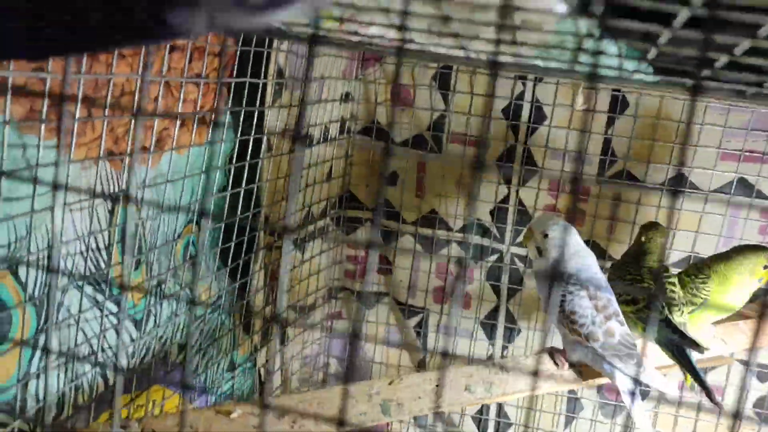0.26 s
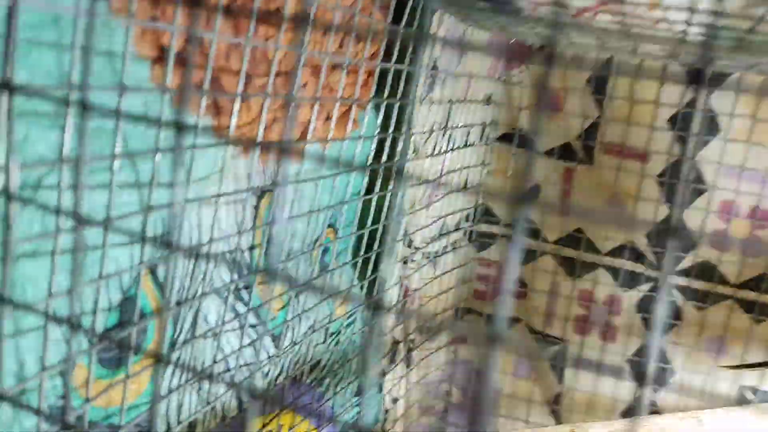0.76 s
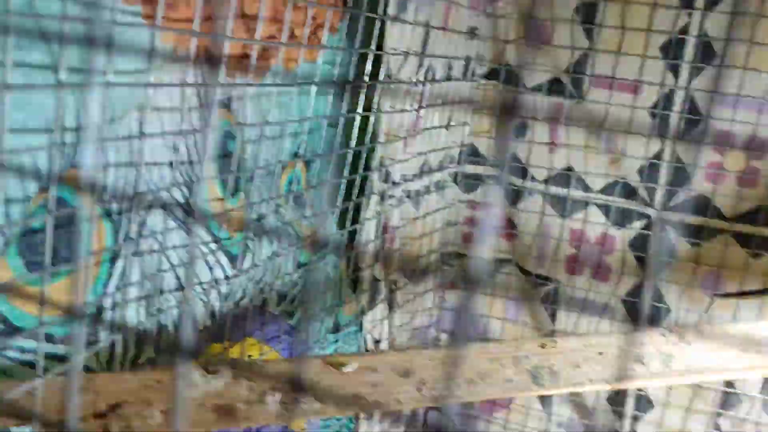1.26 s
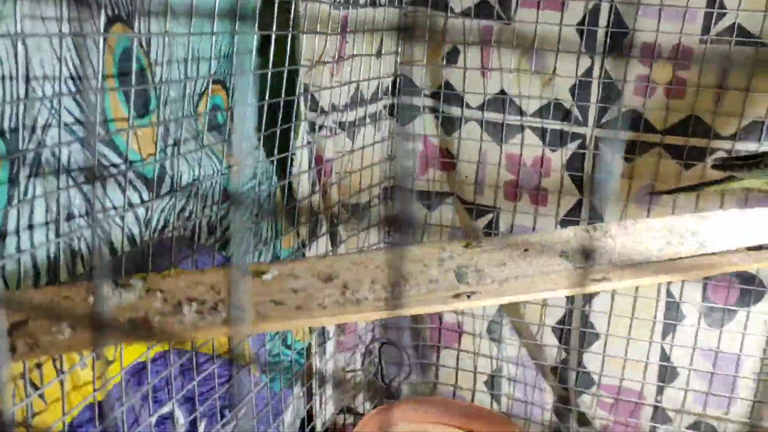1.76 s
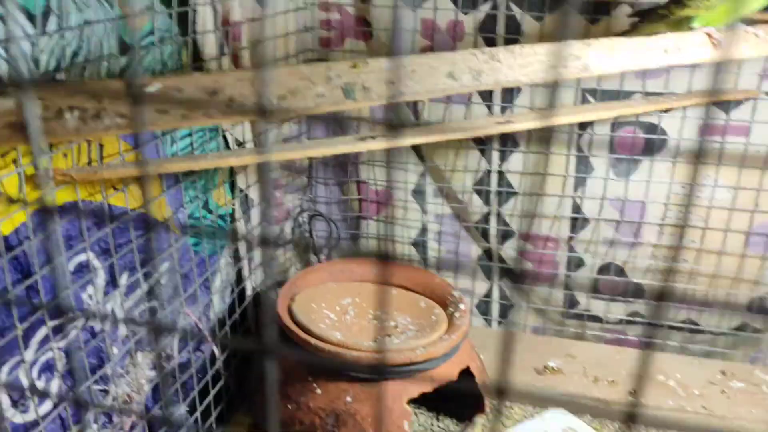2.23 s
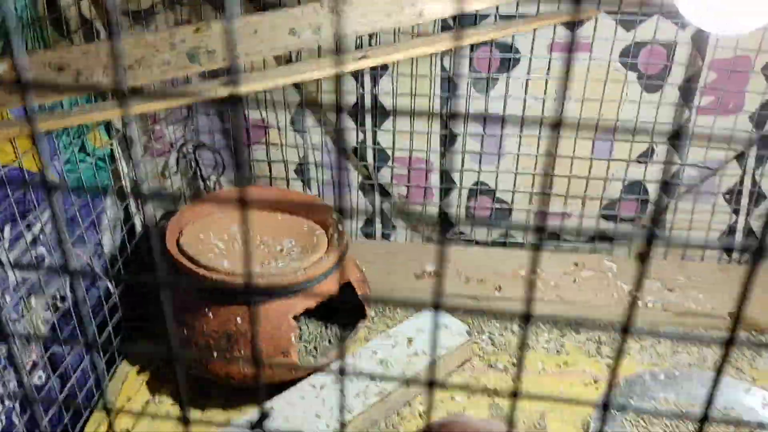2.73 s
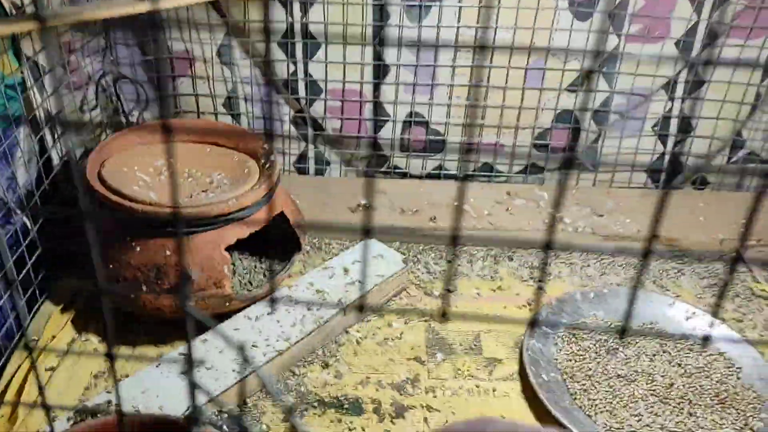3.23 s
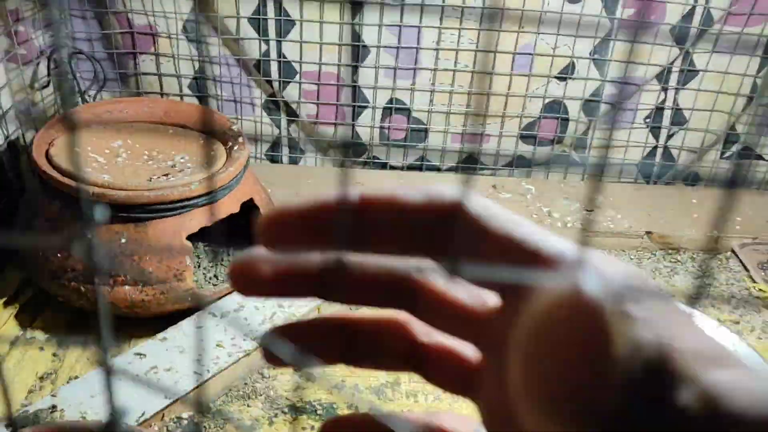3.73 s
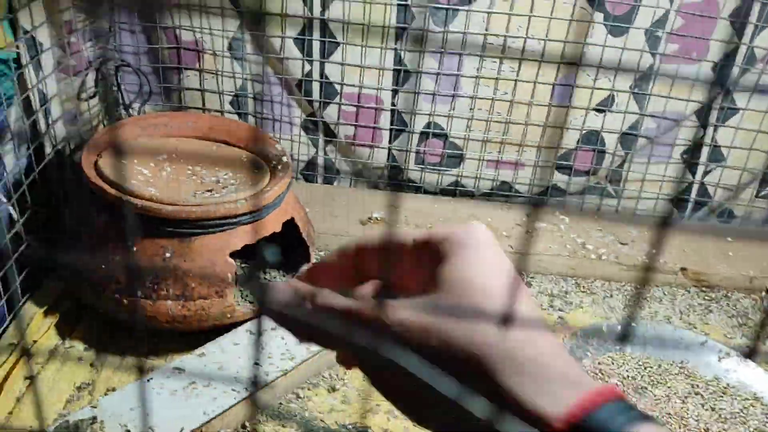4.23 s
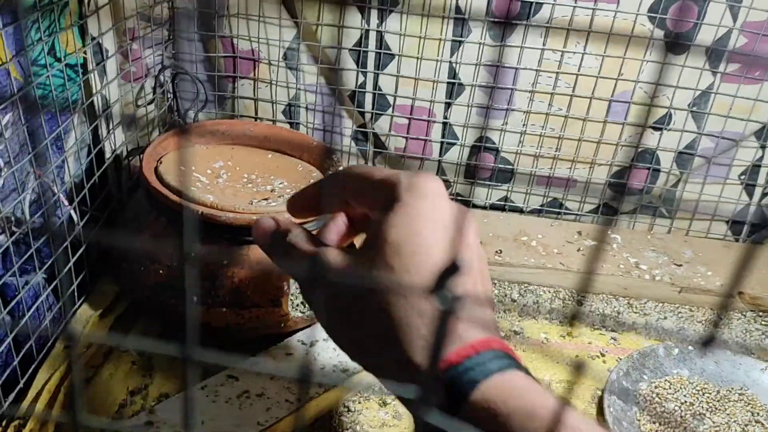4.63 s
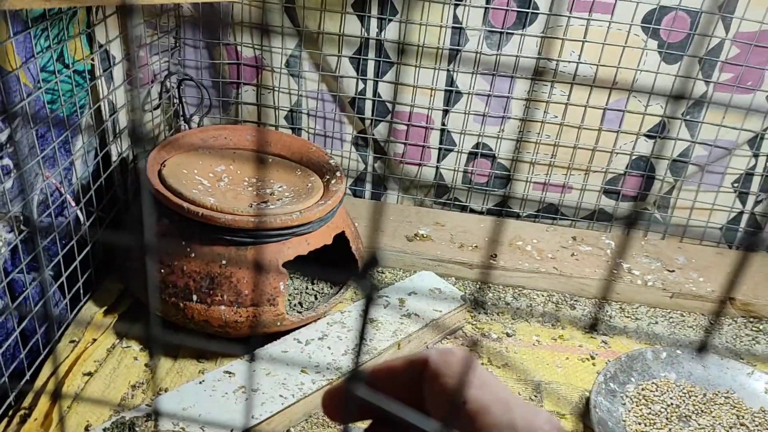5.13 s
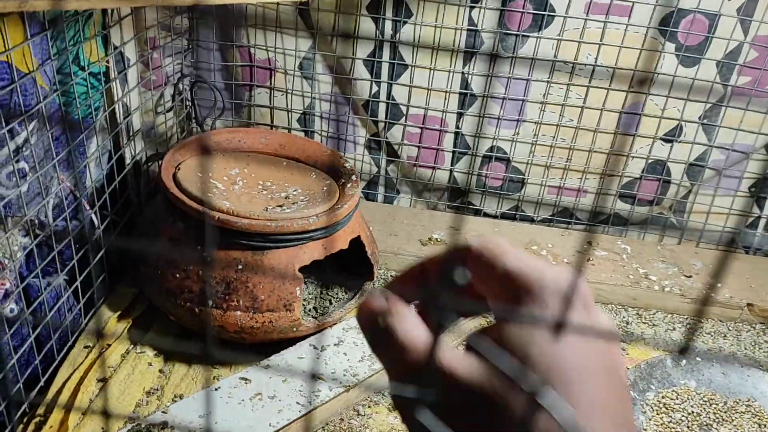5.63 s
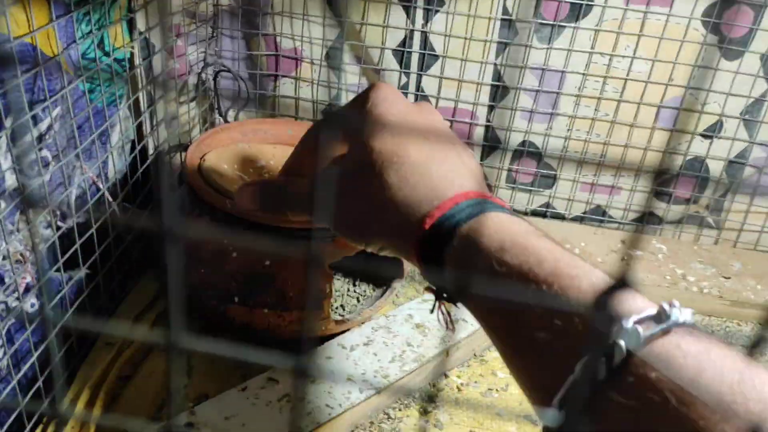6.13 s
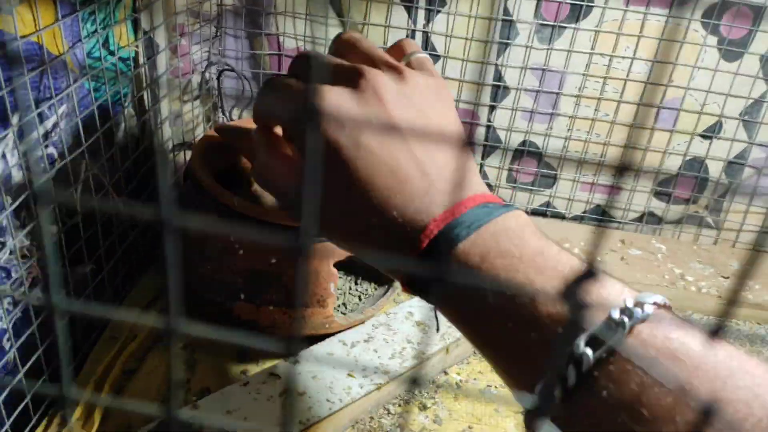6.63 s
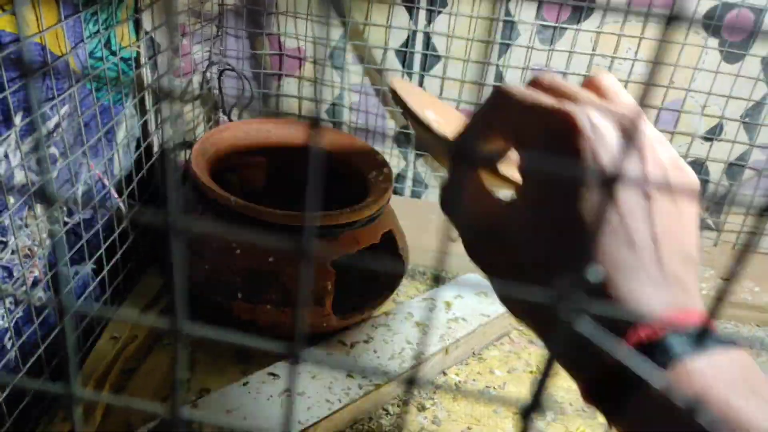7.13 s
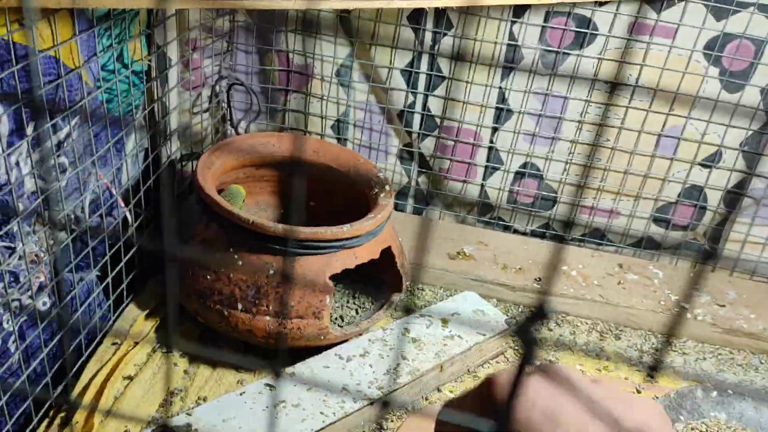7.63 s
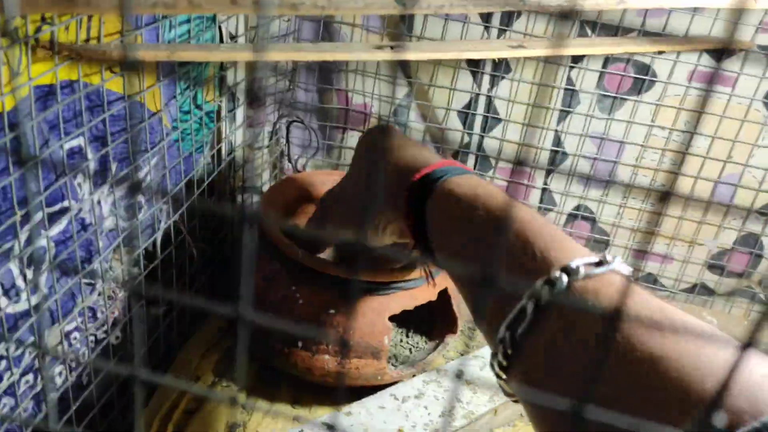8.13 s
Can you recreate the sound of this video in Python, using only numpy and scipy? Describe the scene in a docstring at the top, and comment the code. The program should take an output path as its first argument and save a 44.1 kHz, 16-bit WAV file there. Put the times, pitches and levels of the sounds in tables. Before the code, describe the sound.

A budgie chick begs with rapid, high, raspy chirps from a clay pot, after a brief flutter of wings in a wire cage.

```python
"""In a small room, inside a clay nest pot in a wire cage, a budgerigar chick begs about seven times a second.
Each chirp is a train of tiny rising whistles from its syrinx, smeared into a rasp by the pot's walls.
Early on the adults flap off their perch, pushing air, ticking the wire and stirring seed husks.
Later a hand lifts the clay lid with a knock, and the chirps turn louder and brighter."""
import sys
import numpy as np
from scipy import signal
from scipy.fft import rfft, irfft, next_fast_len
from scipy.io import wavfile
from scipy.ndimage import uniform_filter1d, minimum_filter1d, map_coordinates

SR = 44100
rng = np.random.default_rng(int(sys.argv[2]) if len(sys.argv) > 2 else 0)


def to_wav(s):
    """Save 16-bit WAV."""
    ch = np.atleast_2d(s).T  # columns
    pcm = np.round(np.clip(ch, -1, 1) * 32767)  # PCM
    wavfile.write(sys.argv[1], SR, pcm.astype(np.int16))


N = 369999
TIME = np.arange(N) / SR

# EQ curves for the noise layers (frequency [Hz], level [dB])
ROOM_EQ = [(15, -61), (25, 14.5), (50, 1), (75, 3), (95, -11.5), (213, -4.5), (293, -11.5), (462, -12.5),
           (879, -19), (1120, -22), (7280, -44.5), (15000, -77)]
DRAUGHT_EQ = [(15, -44), (25, 14), (213, 11.5), (405, -2.5), (475, -0.5), (724, -2.5), (2220, -18.5),
              (3000, -15), (3900, -97), (6600, -120)]
RUSTLE_EQ = [(600, -14), (1500, -9), (3000, -3), (5000, -9.5), (7500, 8), (8800, 6), (10500, -15.5),
             (15500, -18.5)]
SCUFF_EQ = [(100, -40), (330, 3.5), (550, 1.5), (800, -1.5), (1400, -7), (2500, -15), (6000, -46)]
THUD_EQ = [(60, -38), (200, 10), (600, 2.5), (1200, 1), (2200, -6.5), (8000, -16)]
FRAME_EQ = [(160, 14.5), (1300, 6), (2400, 9.5), (5000, -53)]
PUFF_EQ = [(10, -40), (28, -3), (60, 3), (170, 0), (400, -20)]
CLACK_EQ = [(100, -17), (250, 2), (1500, -11), (4000, -12), (9000, -49)]

# birds and hand stirring the cage (time [s], length [s], draught [dB], husks [dB])
SHUFFLES = [(0.48, 0.55, -49.5, -39), (1.883, 0.93, -54.5, -40), (4.646, 0.35, -63, -43.5),
            (5.719, 0.043, -73, -29.5), (5.903, 1, -58, -57.5), (7.334, 0.19, -51.5, -39),
            (7.485, 0.48, -47, -50), (8.122, 0.37, -55, -52)]
# dry scuffs on cage and clay (time [s], length [s], level [dB])
SCUFFS = [(0.063, 0.31, -57.5), (2.409, 0.085, -37), (2.536, 0.29, -51), (2.95, 0.16, -50),
          (7.274, 0.17, -47)]
# dull bumps on the cage (time [s], level [dB], ring [Hz])
BUMPS = [(0.755, -29.5, 298), (1.047, -27, 255), (1.162, -26.5, 180), (1.386, -29.5, 505),
         (1.488, -29.5, 505), (1.938, -28.5, 158), (2.441, -25.5, 454), (2.979, -34.5, 545),
         (3.415, -33, 628), (3.42, -31.5, 156), (4.913, -37.5, 380), (6.687, -36, 254)]
# claws and wing tips on the wire (time [s], level [dB], frame relative to tick [dB])
TAPS = [(0.239, -68.5, 27.5), (0.603, -33, -28), (0.635, -18, -11.5), (0.7585, -10.5, -4), (0.799, -19, -8),
        (0.824, -21.5, -3), (1.032, -25, -38), (1.042, -14.5, -33), (1.156, -23, -3.5), (1.193, -22, -30),
        (1.2744, -27, -5), (2.206, -14.5, -22)]
# the adults' swishes and squeaks (time [s], length [s], level [dB], start pitch [Hz], end pitch [Hz])
SWISHES = [(0.519, 0.034, -16, 8580, 7420), (0.692, 0.052, -32, 8540, 7750), (0.886, 0.07, -30, 9260, 8340),
           (0.894, 0.059, -37.5, 4210, 3320), (0.955, 0.04, -25, 7960, 6650),
           (1.082, 0.058, -22.5, 7700, 6400), (5.599, 0.088, -40, 3400, 3950),
           (5.605, 0.064, -43, 2080, 1950), (5.876, 0.078, -44.5, 2740, 2520)]
# the adults' bursts of flight (time [s], length [s], air [dB], feathers [dB])
FLIGHTS = [(0.677, 0.18, -36, -34), (1.043, 0.97, -36, -33.5)]
# the shaken cage's ring (frequency [Hz], width [Hz], level [dB])
CAGE_MODES = [(570, 100, -2.5), (872, 67, -3.5)]
# the lid knocking on the pot (time [s], level [dB])
LID_KNOCKS = [(6.756, -19.5), (6.766, -34), (7.294, -36)]
# the lid's ring (frequency [Hz], level [dB], t60 [s])
LID_MODES = [(221, 1, 0.1), (380, -19.5, 0.0557), (587, 5.5, 0.035), (1150, 5.5, 0.052), (1620, 0, 0.069),
             (2440, -2, 0.035), (4000, -15, 0.062)]

# cues for the chick's chirps (time [s])
CHIRP_STARTS = [1.345, 1.463, 1.581, 1.706, 1.832, 1.955, 2.087, 2.216, 2.345, 2.474, 2.61, 2.735, 2.863,
                2.994, 3.122, 3.257, 3.388, 3.53, 3.676, 3.825, 3.98, 4.124, 4.255, 4.393, 4.533, 4.668,
                4.801, 4.937, 5.089, 5.228, 5.375, 5.531, 5.670, 5.812, 5.956, 6.1, 6.240, 6.384, 6.545,
                7.039, 7.183, 7.365, 7.521, 7.679, 7.898, 8.333]
# harmonics 1-5 of the syrinx (level [dB])
HARMONICS_DB = [-6, 0, -6, -19, -27]
# the syrinx's breathy rasp (frequency [Hz], level [dB])
RASP_EQ = [(900, -53.5), (1500, -9.5), (2200, -3), (2900, -3), (3500, 5), (4600, -3), (6000, -13.5),
           (7300, 7), (8700, -13), (9900, -1), (11200, -1), (12600, -11), (15500, -22.5)]
# pulsing inside the chirps, slowing as the begging goes on (time [s], rate [Hz])
PULSE_RATE = [(1.3, 127.3), (3.1, 112.3), (4.2, 113.4), (5.2, 114.3), (6.2, 107), (8.3, 100.5)]
# effort through one chirp (progress [0-1], level [dB], pitch [ratio])
EFFORT = [(0, -2, 1.14), (.13, -.3, 1.09), (.27, 1.2, 1.05), (.55, .3, 1.01), (.8, -2.5, .98),
          (1, -11, .94)]
# send to the pot's strongest air resonance (time [s], level [dB])
POT_RING_SEND = [(1.4, -44), (2.2, 6.5), (3.7, 15.5), (4.3, 4), (5.5, 7.5), (6.6, -19), (8.3, -16)]
# a notch in the chirps just above that resonance (time [s], gain [dB])
NOTCH_GAIN = [(1.4, -13), (3.3, -18), (6.2, -8.5), (7.2, -6)]
# low shelf on the chirps' body (time [s], gain [dB])
BODY_SHELF = [(1.6, 1), (2.8, -3.5), (4.1, -4), (4.8, -2.5), (5.6, -0.5), (6.4, 2.5), (7.2, -6)]
# colour of the way out of the pot (frequency [Hz], lid on [dB], lid off [dB], left minus right [dB])
POT_PATH = [(1340, 5, 5, 1.5), (1960, 2, 1.5, 5), (3086, -2.5, 5, -7), (3220, -9.5, -7, -4),
            (4490, 5.5, 8.5, 3.5), (5450, 9, 6.5, 9), (7290, 7, 3.5, -11), (7810, 5.5, 9.5, -0.5),
            (8560, 9, 12, 19.5), (9940, -13.5, -14, 5), (10910, -0.5, -6.5, 2.5), (12470, -15, -3, 4),
            (15600, 0, -13, -3)]
# stereo phase of the pot's sound (frequency [Hz], left lead [rad])
POT_PHASE = [(0, 0), (1500, -1.2), (2900, -1.9), (4500, -1.5), (16000, -1.4)]

LID_OFF_S = 6.9


def undb(db):
    """Decibels to gain."""
    return 10 ** (np.asarray(db) / 20)


def unit(x):
    """Scale to rms 1."""
    return x / np.sqrt(np.mean(x ** 2) + 1e-18)


def curve(at, points):
    """Read a breakpoint curve."""
    return np.interp(at, *np.transpose(points))


def eq_gains(points, size):
    """Gain in each FFT bin for an EQ curve."""
    hz, db = np.transpose(points)
    bins = np.maximum(np.fft.rfftfreq(size, 1 / SR), 1)
    return undb(np.interp(np.log(bins), np.log(hz), db))


def colour(x, points):
    """Zero-phase EQ."""
    size = next_fast_len(x.shape[-1])
    return irfft(rfft(x, size) * eq_gains(points, size), size)[..., :x.shape[-1]]


def ringing(x, points):
    """Minimum-phase EQ: resonances ring on after the sound that excites them."""
    size = len(x)
    cepstrum = irfft(np.log(eq_gains(points, size)), size)[:size // 2]
    return irfft(rfft(x) * np.exp(2 * rfft(cepstrum, size) - cepstrum[0]), size)


def resonate(x, hz, width_hz):
    """One resonance, gain 1 at its centre."""
    return signal.lfilter(*signal.iirpeak(hz, hz / width_hz, fs=SR), x)


def walk(rate, size):
    """Smooth random motion with spread 1."""
    hold = max(int(SR / rate), 1)
    steps = np.repeat(rng.standard_normal(size // hold + 1), hold)
    return unit(uniform_filter1d(steps, hold))[:size]


def stereo_noise(likeness, size):
    """Left and right noise that are partly alike."""
    centre = np.sqrt(likeness) * rng.standard_normal(size)
    return centre + np.sqrt(1 - likeness) * rng.standard_normal((2, size))


def pan(db):
    """Stereo gains with the left louder by db."""
    return undb(np.array([[db], [-db]]) / 2)


def phase_spread(x, points):
    """Shift the phase between left and right along a curve."""
    angle = curve(np.fft.rfftfreq(x.shape[-1], 1 / SR), points)
    return irfft(rfft(x) * np.exp(.5j * np.array([angle, -angle])), x.shape[-1])


def fade(t, t60):
    """Exponential decay."""
    return np.exp(-np.log(1000) * t / t60)


def swell(s, length, attack_s, release_s):
    """Envelope that rises from time s, holds and dies away."""
    return np.clip((TIME - s) / attack_s, 0, 1) * np.exp(-np.maximum(TIME - s - length, 0) / release_s)


def add(out, s, x):
    """Mix x in at time s."""
    i = max(int(s * SR), 0)
    out[:, i:i + x.shape[-1]] += x[..., :max(N - i, 0)]


def reverb(x, t60, wet_db, predelay_s, size):
    """The direct sound, then dense dying reflections in stereo."""
    t = np.arange(size) / SR
    response = rng.standard_normal((2, size)) * fade(t, t60) * (t > predelay_s)
    response *= undb(wet_db) / np.sqrt(np.sum(response ** 2, axis=1, keepdims=True))
    response[:, 0] += 1
    return signal.fftconvolve(np.atleast_2d(x), response, axes=1)[:, :x.shape[-1]]


def room_tone(level_db=-50):
    """A faint low bed, leaning left."""
    return unit(colour(stereo_noise(.61, N), ROOM_EQ)) * pan(5.4) * undb(level_db)


def moving_air(gust_db=2):
    """The gusty rumble of a draught, leaning left."""
    return unit(colour(stereo_noise(.86, N), DRAUGHT_EQ) * undb(gust_db * walk(24, N))) * pan(7)


def dry_rustle(grain_db=4.5, flutter_db=5):
    """The grainy texture of feathers or seed husks."""
    grains = stereo_noise(.045, N) * undb(grain_db * walk(480, N) + flutter_db * walk(34, N))
    return unit(colour(grains, RUSTLE_EQ))


def shuffles(draught, husks, still_db=-62):
    """Movement in the cage stirs air and seed husks; the husks tick faintly in between."""
    movement = [swell(s, length, attack_s=.062, release_s=.023) for s, length, _, _ in SHUFFLES]
    air_gain, husk_gain = undb(np.array(SHUFFLES)[:, 2:]).T @ movement
    return air_gain * draught + (undb(still_db) + husk_gain) * husks


def scuffs(grain_db=3.5):
    """Short uneven scrapes on cage and clay."""
    scrape = unit(colour(stereo_noise(.12, N) * undb(grain_db * walk(110, N)), SCUFF_EQ))
    gain = sum(undb(db) * swell(s, length, attack_s=.035, release_s=.012) for s, length, db in SCUFFS)
    return scrape * gain


def bumps(thud_db=-4, attack_s=.0038):
    """Soft blows: one damped ring of the cage over a short thud."""
    out, t = np.zeros((2, N)), np.arange(SR // 4) / SR
    for s, db, hz in BUMPS:
        ring = np.sin(2 * np.pi * hz * t) * fade(t, .082)
        thud = unit(colour(stereo_noise(.072, len(t)), THUD_EQ)) * fade(t, .13)
        add(out, s, undb(db) * (ring + undb(thud_db) * thud) * np.minimum(t / attack_s, 1))
    return out


def taps(trim_db=-1):
    """Claws and wing tips tick brightly on the wire, with a duller knock from the frame."""
    out, t = np.zeros((2, N)), np.arange(SR // 10) / SR
    for s, db, frame_db in TAPS:
        tick = unit(colour(stereo_noise(.032, len(t)), RUSTLE_EQ)) * fade(t, .032)
        frame = unit(colour(stereo_noise(.13, len(t)), FRAME_EQ)) * fade(t, .03)
        add(out, s, undb(db + trim_db) * (tick + undb(frame_db) * frame))
    return out


def swishes(hiss_db=-4, fall_db=7, width_ratio=.28):
    """Wing swishes and soft squeaks: a narrow noise band glides and fades over a broad hiss."""
    out = np.zeros((2, N))
    for s, length, db, from_hz, to_hz in SWISHES:
        t = np.arange(int(length * SR)) / SR
        phase = 2 * np.pi * np.cumsum(from_hz * (to_hz / from_hz) ** (t / length)) / SR
        width_hz = width_ratio * from_hz
        band = np.array([walk(width_hz, len(t)) * np.cos(phase) + walk(width_hz, len(t)) * np.sin(phase)
                         for _ in range(2)])
        hiss = unit(colour(stereo_noise(0, len(t)), RUSTLE_EQ))
        edges = np.clip(np.minimum(t / .0029, (length - t) / .0089), 0, 1)
        add(out, s, undb(db - fall_db * t / length) * edges * (band + undb(hiss_db) * hiss))
    return out


def wings(draught, feathers, beat_hz=18.65, sag_db_per_s=5.5):
    """Each wingbeat pushes a puff and a rising whoop of air, shakes the cage and brushes the feathers."""
    stroke = np.abs(beat_hz * TIME + .06 * walk(6, N)) % 1
    strength = undb(2.5 * walk(beat_hz, N))
    flap = unit(strength * undb(4.5 * np.sin(2 * np.pi * stroke)))
    puffs = unit(colour(flap ** 3, PUFF_EQ))
    whoop_hz = 195 * np.sqrt(stroke) * (1 + .15 * walk(80, N))
    whoop = unit(strength * np.sin(np.pi * stroke) * np.sin(2 * np.pi * np.cumsum(whoop_hz) / SR))
    shake = flap * stereo_noise(.44, N)
    rattle = unit(sum(undb(db) * resonate(shake, hz, width) for hz, width, db in CAGE_MODES))
    body = undb(-5) * puffs + undb(-6) * whoop + undb(-10) * rattle
    air = undb(-3) * flap * draught + body * pan(6.6)
    effort = [swell(s, length, attack_s=.014, release_s=.029)
              * undb(-sag_db_per_s * np.maximum(TIME - s, 0)) for s, length, _, _ in FLIGHTS]
    air_gain, feather_gain = undb(np.array(FLIGHTS)[:, 2:]).T @ effort
    return air_gain * air + feather_gain * flap * feathers


def lid(ring_db=-10, grit_db=-7, clack_db=-6):
    """Clay knocks on clay: a short ring, a gritty scrape and a rough clack."""
    out, t = np.zeros((2, N)), np.arange(SR // 5) / SR
    for s, db in LID_KNOCKS:
        ring = sum(undb(mode_db) * np.sin(2 * np.pi * (hz * t + rng.random((2, 1)) / 2)) * fade(t, t60)
                   for hz, mode_db, t60 in LID_MODES)
        grit = unit(colour(stereo_noise(.45, len(t)), RUSTLE_EQ)) * fade(t, .034)
        clack = unit(colour(stereo_noise(.085, len(t)), CLACK_EQ)) * fade(t, .061)
        add(out, s, undb(db) * (undb(ring_db) * ring + undb(grit_db) * grit + undb(clack_db) * clack))
    return out


def beak_tick(size, voice_start, level_db=-20, scatter_db=5, early_s=.0035):
    """The beak parts with a tiny click just before the voice, now faint, now clear."""
    t = (np.arange(size) - voice_start) / SR + early_s * rng.random()
    gain = undb(level_db + scatter_db * rng.standard_normal())
    return gain * unit(colour(rng.standard_normal(size), RASP_EQ)) * fade(np.abs(t), .004) * (t > 0)


def whistle(hz, doubling=0):
    """One side of the syrinx; alternating strong and weak cycles add a throaty partial at 2.5 times hz."""
    phase = 2 * np.pi * np.cumsum(hz) / SR
    harmonics = sum(undb(db) * np.sin(k * phase) * (k * hz < SR / 2)
                    for k, db in enumerate(HARMONICS_DB, start=1))
    return harmonics + doubling * np.sin(2.5 * phase)


def syrinx(length, base_hz, pulse_hz, rasp_db, open_share=.82, sweep=.36, crest=.62, tiring_db=-3):
    """One chirp: the syrinx opens in pulses; in each a whistle arches up and drags the rasp with it."""
    t = np.arange(6144) / SR
    progress = np.minimum(t / length, 1)
    marks, effort_db, bend = np.transpose(EFFORT)
    head_start_s = .0078 * (1 - np.exp(-t / .02))  # the pulses start hurried, then slow
    stumble = .34 * progress * walk(60, len(t))
    pulses = np.abs(pulse_hz * (t + head_start_s) + stumble)
    pitch_scatter, level_scatter = rng.standard_normal((64, 2))[pulses.astype(int)].T
    opening = np.minimum(pulses % 1 / open_share, 1)
    gate = np.sin(np.pi * opening)
    dip = sweep * (1 - opening / crest) ** 2
    pitch = base_hz * np.interp(progress, marks, bend) * (1.025 - dip)
    pitch *= 1 + .03 * pitch_scatter + .008 * walk(2400, len(t))
    # the other side of the syrinx fades in, lower and softer
    lower_pitch = pitch * .76 * (1 + .02 * walk(300, len(t)))
    fade_in = np.sqrt(2 * progress)
    whistles = whistle(pitch, doubling=.35 * fade_in) + undb(-12) * fade_in * whistle(lower_pitch)
    # the beak opens and closes once a chirp, lifting and lowering the rasp's resonances
    speed = 1 + .08 * (np.sin(np.pi * progress) - 2 / np.pi) - .5 * (dip - dip.mean())
    breath = unit(colour(rng.standard_normal(len(t)), RASP_EQ))
    rasp = map_coordinates(breath, [np.cumsum(speed)], mode="mirror")
    effort = undb(np.interp(progress, marks, effort_db) + 1.8 * level_scatter)
    release = np.clip((length - t) / .003, 0, 1)
    # the syrinx gradually stops shutting between pulses: the whistle weakens, the rasp leaks through
    leak = np.maximum(gate * .7, progress) * undb(rasp_db)
    return effort * release * (gate * unit(whistles) * undb(tiring_db * (progress + 1.5)) + leak * rasp)


def throat(voice, hz=2150, shift=.07):
    """A low throat resonance that shifts from chirp to chirp."""
    return voice + resonate(voice, hz * (1 + shift * rng.standard_normal()), width_hz=170)


def clay_pot(voice, s, ring_hz=2930, notch_hz=3540, shelf_hz=5000, scatter_db=1.7, sway_db=1):
    """The chirp at time s bounces round the pot and leaves by the door hole, or by the open top."""
    ring = resonate(voice, ring_hz * (1 + .02 * rng.standard_normal()), width_hz=400)
    voice = voice + undb(curve(s, POT_RING_SEND)) * ring
    voice = voice - (1 - undb(curve(s, NOTCH_GAIN))) * resonate(voice, notch_hz, width_hz=280)
    # the chick shifts about, so every chirp leaves with its own colour
    path_hz, shut_db, open_db, lobe_db = np.transpose(POT_PATH)
    path_db = (open_db if s > LID_OFF_S else shut_db) + scatter_db * rng.standard_normal(len(path_hz))
    path_db += curve(s, BODY_SHELF) * (path_hz < shelf_hz)
    voice = ringing(voice, np.c_[path_hz, path_db])
    smeared = reverb(voice, t60=.04, wet_db=-3.5, predelay_s=.0003, size=2048)
    # left and right lie in different lobes of the pot's radiation
    stereo = np.array([unit(colour(channel, np.c_[path_hz, side * lobe_db / 2]))
                       for channel, side in zip(smeared, (1, -1))])
    return phase_spread(stereo, POT_PHASE) * pan(sway_db * rng.standard_normal())


def begging(level_db=-21.5, gap_share=.49, longest_s=.084, run_hz=2907, rested_hz=3144):
    """Start, length, level and base pitch of each chirp: slow begging draws it out, a rest lifts it."""
    starts, gaps = np.array(CHIRP_STARTS), np.diff(CHIRP_STARTS)
    lengths = np.minimum(gap_share * np.r_[gaps, np.inf], longest_s)
    warm_up_db = -3 * np.exp(-(starts - starts[0]) / .44)
    open_pot_db = 2.5 * (starts > LID_OFF_S)
    hz = curve(np.r_[np.inf, gaps], [(.17, run_hz), (.22, rested_hz)])
    hz *= 1 + .024 * rng.standard_normal(len(starts))
    return zip(starts, lengths, level_db + warm_up_db + open_pot_db, hz)


def chick(preroll=336):
    """Syrinx and beak sound through throat and pot, raspier once the lid is off."""
    out = np.zeros((2, N))
    for s, length, db, hz in begging():
        voice = syrinx(length, hz, curve(s, PULSE_RATE), rasp_db=-2 if s > LID_OFF_S else -7)
        voice = np.pad(voice, (preroll, 0))
        voice = throat(voice + beak_tick(len(voice), preroll))
        makeup = np.sqrt(len(voice) / (length * SR))  # level counts over the chirp's own length
        add(out, s - preroll / SR, clay_pot(voice, s) * undb(db) * makeup)
    return out


def scene():
    """Chick and spot effects in light room reverb, over room tone and movement in the cage."""
    spots = chick() + swishes() + taps() + bumps() + lid()
    spots = reverb(spots, t60=.64, wet_db=-33.5, predelay_s=.0056, size=16384)
    bed = room_tone()
    draught, rustle = moving_air(), dry_rustle()
    return spots + bed + wings(draught, rustle) + shuffles(draught, rustle) + scuffs()


def record(dry, ceiling=.8, window=89, top_hz=15900):
    """A limiter holds down the loudest peaks, and a steep low-pass trims the top."""
    gain = np.minimum(1, ceiling / (np.abs(dry).max(axis=0) + 1e-9))
    gain = uniform_filter1d(minimum_filter1d(gain, window), window)
    return signal.sosfilt(signal.ellip(10, .2, 80, top_hz, fs=SR, output="sos"), dry * gain)


dry = scene()
out = record(dry)
to_wav(out)
```